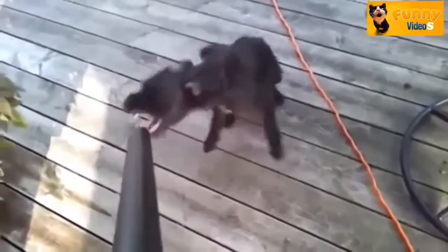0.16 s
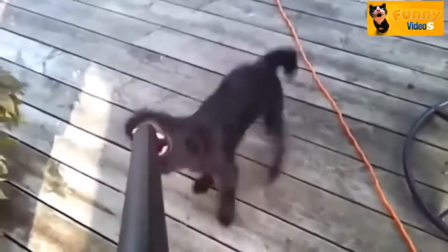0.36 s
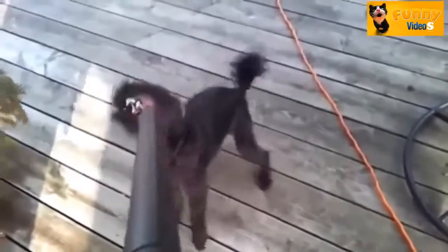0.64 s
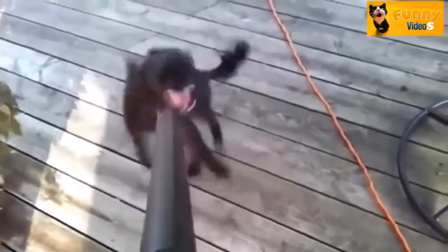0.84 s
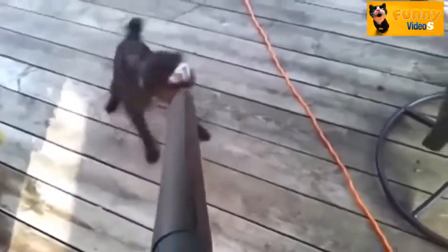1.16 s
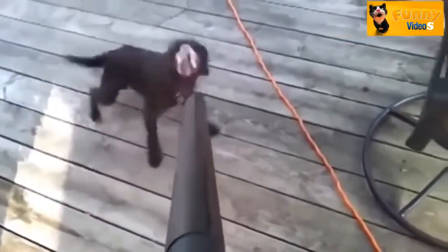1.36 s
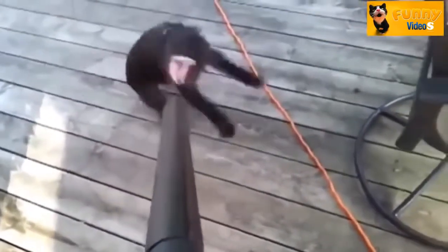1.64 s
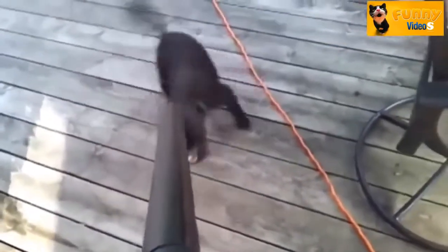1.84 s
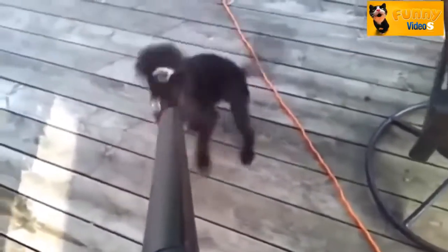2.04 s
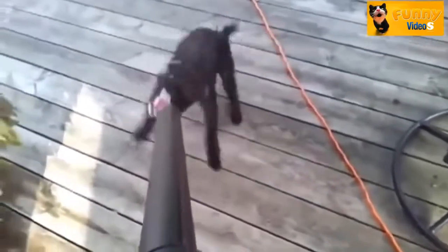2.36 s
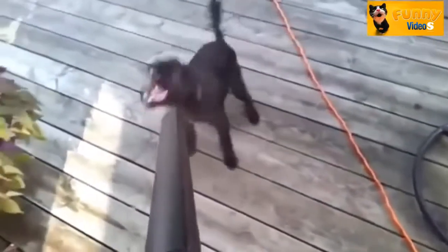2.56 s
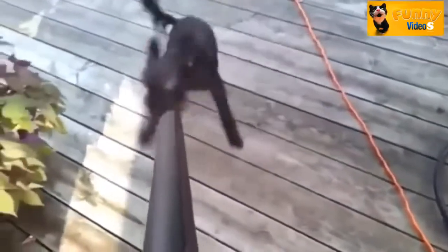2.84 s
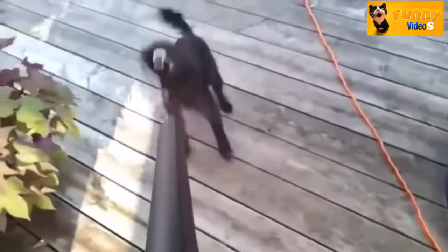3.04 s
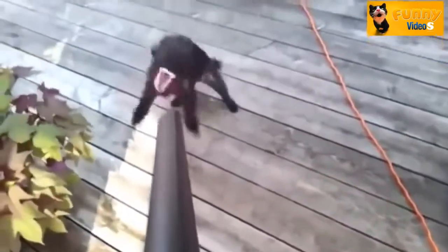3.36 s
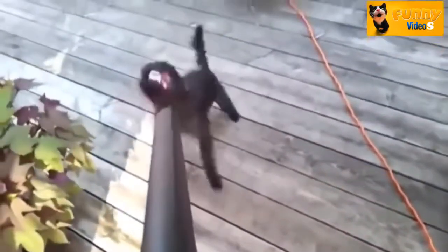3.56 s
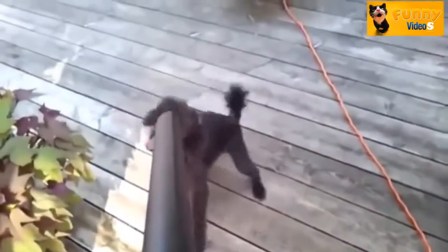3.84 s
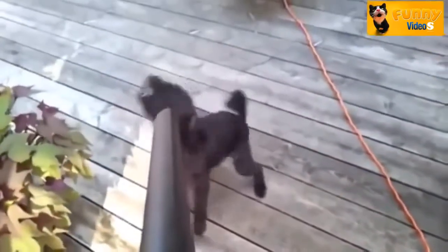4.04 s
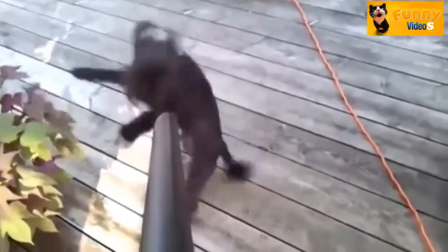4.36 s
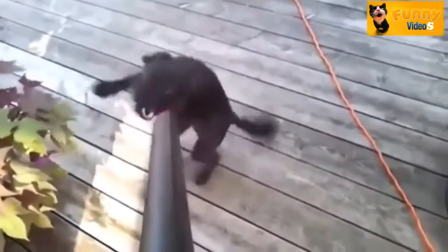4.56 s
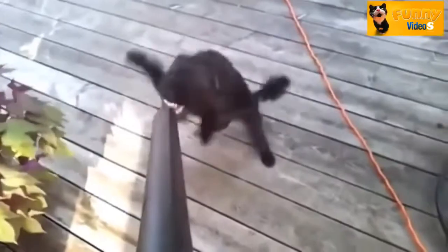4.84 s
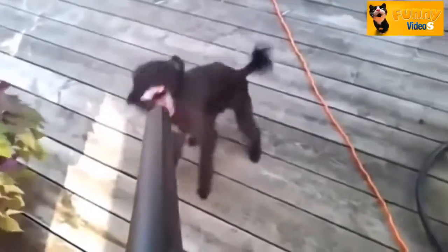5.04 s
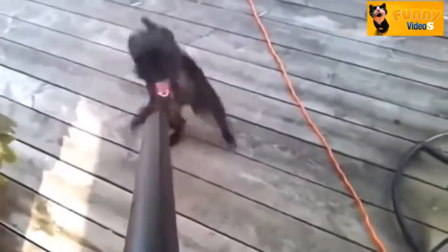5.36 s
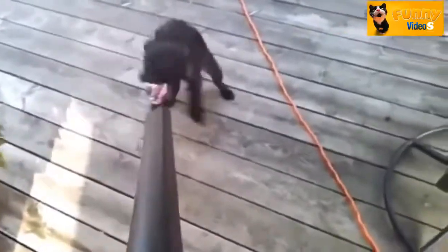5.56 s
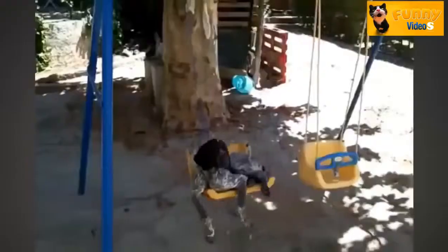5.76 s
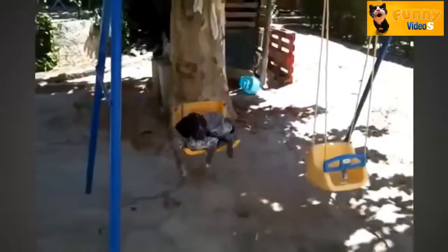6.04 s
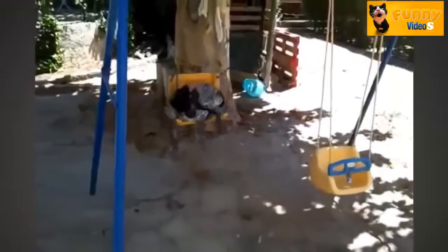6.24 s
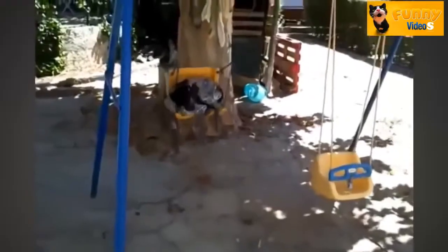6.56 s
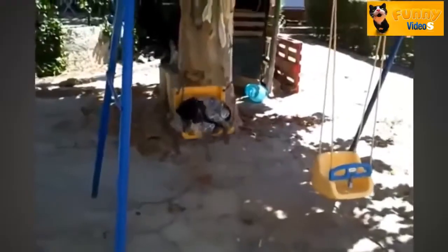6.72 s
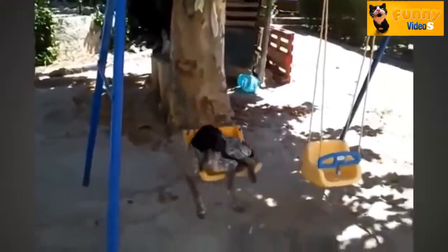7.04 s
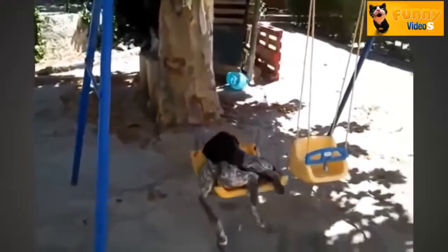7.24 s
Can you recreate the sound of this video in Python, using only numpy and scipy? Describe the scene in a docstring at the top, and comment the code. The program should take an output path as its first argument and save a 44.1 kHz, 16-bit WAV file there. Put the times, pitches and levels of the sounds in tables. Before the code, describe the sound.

Very close outdoors on a wooden deck, an electric leaf blower runs flat out, a harsh, overloaded rush of air with a steady electric whine. A dog biting at the jet causes irregular hissy, hollow-mouthed bursts. It stops abruptly. After a short silence, a much quieter yard fades in with low wind buffeting, faint leaf rustle and a swing that hums, creaks and finally squeals.

```python
"""An electric leaf blower at full power on a wooden deck, so close that it overloads the microphone: turbulent noise
coloured by the tube, and motor lines locked to the shaft; a dog bites at the jet, adding hiss and mouth rings.
The sound stops dead. After a silence a quiet yard fades in: filtered noise for wind buffeting the microphone,
a murk and rustling leaves, and a swing that hums, creaks and squeals by resonance and stick-slip."""
import sys
import numpy as np
from scipy import signal
from scipy.fft import rfft, irfft
from scipy.io import wavfile
from scipy.ndimage import uniform_filter1d

SR = 44100
rng = np.random.default_rng(int(sys.argv[2]) if len(sys.argv) > 2 else 0)


def to_wav(s):
    """Save 16-bit WAV."""
    ch = np.atleast_2d(s).T  # columns
    pcm = np.round(np.clip(ch, -1, 1) * 32767)  # PCM
    wavfile.write(sys.argv[1], SR, pcm.astype(np.int16))


N = 325888

# bites: the muzzle cuts the stream, which hisses, and the open mouth rings
# (middle t/s, half length/s, hiss level/dB, mouth f/Hz, ring level/dB)
MUZZLE_BITES = [(.06, 0.055, 2.5, 1987, 3.5), (.23, 0.05, 7, 3200, 3), (.42, 0.021, 4, 648, 2.5),
                (.52, 0.073, 4.5, 2250, 8), (.68, 0.082, 6, 3480, 3), (.85, 0.095, 5, 1800, 5),
                (1.06, 0.12, 5, 1955, 2), (1.5, 0.084, 0, 3500, 1.5), (1.81, 0.023, 5, 3480, 0.5),
                (1.91, 0.041, 1.5, 3500, 2.5), (2.3, .05, 2, 3000, 0.5), (2.42, 0.045, 5.5, 2005, 6.5),
                (2.68, .035, 4.5, 3500, -0.5), (2.86, 0.036, 1, 2100, 1), (3.0, 0.046, 2.5, 1855, 2.5),
                (3.62, 0.034, 1.5, 1990, 1), (3.83, 0.032, 1, 2014, 0.5), (4.5, 0.052, 2, 2000, 1),
                (4.75, 0.055, 5, 2206, 2), (4.89, 0.043, 5.5, 2000, 7), (5.1, 0.064, 2.5, 3000, -1),
                (5.21, .04, 5.5, 3530, -0.5), (5.34, 0.082, 4.5, 3010, 0), (5.5, .03, 3.5, 3000, -1),
                (5.63, 0.11, 3.5, 3520, -1), (5.83, 0.032, 3, 1994, 0)]
JET_FLICKER_DB = 0.75


def jet():
    """Edge noise of an obstructed jet: rise of its hiss in dB, bite by bite, with a random flicker."""
    t = np.arange(N) / SR
    hiss_db = sum(db * bump(t, s, half, order=3) for s, half, db, *_ in MUZZLE_BITES)
    return hiss_db + JET_FLICKER_DB * wander(15)


# relative spectrum of the fan's turbulence (f/Hz, level per Hz/dB)
TURBULENCE_SPECTRUM = [(8.8, -56), (15, -15.5), (123, -19), (307, -10), (468, -3.5), (592, -7), (855, -7.5),
                       (1080, -7.5), (1170, -10), (1450, -7), (1560, -8), (2090, -8), (6630, -15),
                       (7970, -24), (10400, -64), (17500, -120)]
# how the jet hiss tilts that spectrum (f/Hz, share of the jet hiss change/1)
HISS_SHARES = [(400, 0.14), (900, 0.028), (1500, 0.69), (3000, 0.36), (5000, 1.02), (8000, 1.45)]
# resonances of the blower tube (f/Hz, width/Hz, level/dB)
TUBE_RESONANCES = [(480, 120, 0), (700, 76, 8), (962, 110, 4.5), (1210, 46, 4.5), (1510, 200, -2),
                   (1810, 74, 3), (2215, 120, -1.5), (2500, 43, -3.5), (2770, 87, 2.5), (3010, 150, 2),
                   (3300, 150, 0), (3700, 98, 0.5), (4020, 140, 5)]
MOUTH_WIDTH_HZ = 260
ROAR_DB, ROAR_DROP = -17.5, 0.4  # level without jet hiss; dB lost per dB of jet hiss


def airflow(jet_db):
    """Turbulence noise filtered by resonators: fan air coloured by the tube, brightened by the jet and the mouth."""
    def field_db(hz, t):
        tube_db = sum(db / (1 + (2 * (hz - f) / w) ** 2) for f, w, db in TUBE_RESONANCES)
        mouth_db = sum(db * np.exp(-((hz - f) / MOUTH_WIDTH_HZ) ** 2) * bump(t, s, half)
                       for s, half, _, f, db in MUZZLE_BITES)
        hiss_db = read(HISS_SHARES, hz) * np.interp(t * SR, np.arange(N), jet_db)
        return read(TURBULENCE_SPECTRUM, hz) + tube_db + mouth_db + hiss_db
    return gain_of(ROAR_DB - ROAR_DROP * jet_db) * noise(field_db, patchy_db=1.28)


# brush rate, twice the shaft speed (t/s, f/Hz)
BRUSH_RATE = [(0, 361.3), (.4, 360.3), (.6, 360.5), (.8, 362.3), (1.0, 362.1), (1.2, 361.1), (1.5, 361.5),
              (2.0, 360.7), (2.4, 360.0), (3.2, 359.3), (3.5, 359.6), (4.0, 359.2), (4.3, 359.5),
              (4.75, 358.8), (5.2, 359.5), (5.4, 361.7), (5.6, 363.1), (5.85, 363.1)]
# the blower is swung about, so other faces of its housing point at the microphone
# (t/s, turn/1 about -1 to 1, tilt/1 about 0 to 1)
HOUSING_POSE = [(0, -0.97, 0), (.3, -0.89, .15), (.6, -0.12, 0.4), (.8, -0.58, 0.1), (1.05, -0.65, 0.24),
                (1.25, -1.2, 0), (1.8, -0.5, .1), (2.05, -0.81, 0), (2.4, -0.96, 0.06), (2.62, -1, 0.11),
                (3.0, .3, 0.4), (3.4, 0.06, 0.15), (3.7, 1, 0.22), (4.0, 0.8, -.1), (4.35, 1, 0),
                (4.7, 1, .7), (5.25, 0.24, 1), (5.5, -1.2, 0.25), (5.85, -0.69, 0.28)]
# strong partials: multiples of the brush rate (ratio/1)
STRONG_RATIOS = [1, 2, 3, 4, 5, 6, 9]
# strong partials (level/dB, change per unit of turn/dB, change per unit of tilt/dB, random sway/dB)
STRONG_LEVELS = [(-35.5, -0.5, -3.5, 1.7), (-31, -5.5, -7, 0.5), (-26.5, -1, 1.5, 0.4),
                 (-25.5, -1, -15.5, 1.4), (-39, 9.5, -5, 2), (-29, 0, -18.5, 1.5), (-35.5, 0.5, 2.5, 1.5)]
# weak partials: multiples of the brush rate (ratio/1)
WEAK_RATIOS = [.5, 1.5, 3.5, 4.5, 5.664, 7, 7.5, 8, 10, 10.5, 11, 12, 14, 16, 18, 20]
# weak partials (level before sway/dB)
WEAK_LEVELS = [-44.5, -37, -49.5, -54.5, -39, -40.5, -47, -43.5, -38, -42, -42, -41.5, -47, -44, -56, -49]
# overtones 2 to 5 of the bearing's lowest line (level before sway/dB)
BEARING_OVERTONES = [-45, -46, -46, -43]
BEARING_RATIO = 1.2922  # the bearing rolls at its own ratio to the brush rate
BEARING_DB, BEARING_SWAY_DB = -27, 1.5
LINE_DROP = 0.66  # dB lost by the strong lines and lowest bearing line per dB of jet hiss


def motor(jet_db):
    """Rotational harmonics: lines locked to a shaft that flutters under turbulent load; bites mask the strongest."""
    hz = play(BRUSH_RATE)[0] * (1 + 0.0004 * wander(10))
    turns = np.cumsum(hz) / SR
    turn, tilt = play(HOUSING_POSE)
    strong = 0
    for ratio, (db, turn_db, tilt_db, sway_db) in zip(STRONG_RATIOS, STRONG_LEVELS):
        level_db = db + turn_db * turn + tilt_db * tilt + sway_db * wander(4)
        strong = strong + tone(ratio * hz, level_db, shimmer_db=1.5, shimmer_hz=15)
    # weak lines come and go in four groups; the bearing overtones share these sways
    sway = [np.sqrt(2) * gain_of(2.4 * wander(3)) for _ in range(4)]
    weak = sum(gain_of(db) * sway[i % 4] * np.sin(2 * np.pi * (ratio * turns + rng.random()))
               for i, (ratio, db) in enumerate(zip(WEAK_RATIOS, WEAK_LEVELS)))
    bearing_db = BEARING_DB + BEARING_SWAY_DB * wander(3.7)
    bearing = tone(BEARING_RATIO * hz, bearing_db, shimmer_db=0.0, shimmer_hz=25)
    overtones = sum(gain_of(db) * sway[i] * np.sin(2 * np.pi * (i + 2) * BEARING_RATIO * turns)
                    for i, db in enumerate(BEARING_OVERTONES))
    return (strong + bearing) * gain_of(-LINE_DROP * jet_db) + weak + overtones


# lowest line of the stick-slip squeal (t/s, slip rate f/Hz, level/dB)
SLIP_LINE = [(7.145, 770, -62), (7.168, 785, -46), (7.2, 856, -52), (7.265, 871, -53), (7.285, 872, -44.5),
             (7.35, 868, -48), (7.375, 870, -43), (7.39, 858, -50)]
# multiples 2 to 6 join once the slips lock (full from t/s, full until t/s)
OVERTONE_SPANS = [(7.2, 7.4), (7.235, 7.4), (7.205, 7.4), (7.315, 7.37), (7.22, 7.355)]
# the same multiples (level on joining/dB, slope/(dB per s))
OVERTONE_LEVELS = [(-63, 15), (-53.5, 35), (-53.5, 40), (-59, 5), (-55, 5)]
ENTRY_S = 0.02  # ramp before and after each span
ROUGH_START_DB, ROUGH_END_DB, SWAP_DB = 3.5, 2.0, 1.0  # shimmer at start and end; trading of strength


def squeal(t):
    """Stick-slip oscillation: slips glide up and lock; roughness settles, overtones join and trade strength."""
    hz, lowest_db = play(SLIP_LINE)
    hz = hz * (1 + 0.0029 * wander(60))
    rough_db = np.interp(t, [SLIP_LINE[0][0], SLIP_LINE[-1][0]], [ROUGH_START_DB, ROUGH_END_DB])
    lines = tone(hz, lowest_db, rough_db, shimmer_hz=70)
    for multiple, ((s, end), (db, slope_db)) in enumerate(zip(OVERTONE_SPANS, OVERTONE_LEVELS), start=2):
        joined = np.clip(np.minimum(t - s, end - t) / ENTRY_S + 1, 0, 1)
        level_db = db + slope_db * np.maximum(t - s, 0) + SWAP_DB * wander(20)
        lines = lines + joined * tone(multiple * hz, level_db, rough_db, shimmer_hz=70)
    return lines * between(SLIP_LINE[0][0], N / SR + 1)


# span of the frame's hum (start t/s, end t/s)
HUM_SPAN = (6.67, 7.16)
# the hum's glide (first f/Hz, last f/Hz, top level/dB, change at the ends/dB)
HUM_GLIDE = (493.5, 486, -49.5, -12)
# resonances of a hanger (f/Hz, width/Hz, level/dB)
HANGER_RESONANCES = [(920, 35, 0), (755, 30, -2), (1118, 20, 0)]
# rough rubbing in a hanger (middle t/s, half length/s, level/dB, level of the first ring's neighbours/dB)
HANGER_CREAKS = [(6.62, 0.053, -56, -25), (6.76, .065, -52.5, -2), (6.95, .12, -62, -16)]
# broader rubbing in the links (middle t/s, half length/s, f/Hz, width/Hz, level/dB)
LINK_RUBS = [(7.0, 0.097, 1550, 220, -52), (7.175, .025, 2800, 200, -53), (7.2, .025, 2420, 150, -60),
             (7.24, .06, 3330, 160, -52)]
# tick of a link (t/s, f/Hz, envelope peak level/dB)
LINK_TICK = (7.134, 3900, -40)


def swing():
    """Friction-driven resonance: the frame hums, uneven slips ring the hanger, then lock to a squeal; a link ticks."""
    t = np.arange(N) / SR
    (start, end), (first_hz, last_hz, top_db, ends_db) = HUM_SPAN, HUM_GLIDE
    way = np.clip((t - start) / (end - start), 0, 1)
    hum_hz = first_hz + (last_hz - first_hz) * way
    hum_db = top_db + ends_db * (1 - np.sin(np.pi * way ** 1.4) ** 0.64)
    hum = tone(hum_hz, hum_db, shimmer_db=2.0, shimmer_hz=29.8) * between(start, end)
    slips = rng.standard_normal(N)
    first, *rest = [gain_of(db) * ring(slips, hz, w) for hz, w, db in HANGER_RESONANCES]
    creak = sum(gain_of(db) * bump(t, s, half, order=4) * (first + gain_of(rest_db) * sum(rest))
                for s, half, db, rest_db in HANGER_CREAKS)
    rubs = sum(gain_of(db) * bump(t, s, half) * ring(slips, hz, w) for s, half, hz, w, db in LINK_RUBS)
    s, tick_hz, tick_db = LINK_TICK
    tick = gain_of(tick_db) * np.exp(-((t - s) * 1200) ** 2) * np.sin(2 * np.pi * tick_hz * (t - s))
    return hum + rubs + creak + squeal(t) + tick


# relative spectrum of wind pressure on the microphone (f/Hz, level per Hz/dB)
WIND_SPECTRUM = [(5, -12), (14, 0), (30, -3), (65, -6), (90, -15), (130, -23), (250, -29), (400, -38),
                 (800, -90)]
CALM_DB = -38.5  # wind gain between gusts, before the lumps are evened and faded in
YARD_S = 6.563  # start of the yard


def buffet(gust_db):
    """Turbulent pressure fluctuation: deep lumps whose strength follows the gusts; strong gusts reach higher."""
    count = N - round(YARD_S * SR)
    hz = np.fft.rfftfreq(count, 1 / SR)
    z = rfft(rng.standard_normal(count)) * gain_of(read(WIND_SPECTRUM, hz))
    upper_share = 1 / (1 + (35 / (hz + 1)) ** 4)  # crossover near 35 Hz
    deep, upper = irfft(z * (1 - upper_share), count), irfft(z * upper_share, count)
    over_db = gust_db[-count:]
    lumps = evened(deep + upper * gain_of(0.31 * (over_db - over_db.mean())))
    # the largest lumps are held down by their own local power
    lumps = lumps / np.sqrt(abs(uniform_filter1d(lumps ** 2, size=3600)) + 0.33)
    return np.pad(gain_of(CALM_DB + over_db) * lumps, (N - count, 0))


# gusts (middle t/s, half length/s, level over the calm/dB)
WIND_GUSTS = [(6.87, 0.032, 7.5), (7.069, 0.07, 8), (7.3, .03, 3), (7.4, .03, 13)]
# relative spectrum of the distant murk (f/Hz, level per Hz/dB)
MURK_SPECTRUM = [(88, -33), (150, -6.5), (395, -13.5), (492, -12), (546, -10), (742, -13), (925, -13),
                 (1300, -16.5), (1550, -18.5), (3460, -21.5), (5000, -22), (6500, -49), (11000, -120)]
# relative spectrum of the rustling leaves (f/Hz, level per Hz/dB)
LEAF_SPECTRUM = [(1760, -38), (3000, -14), (3460, -19), (3740, -12), (5750, -6), (6500, -5), (7970, 2.5),
                 (10400, -26), (17500, -120)]
MURK_DB, LEAVES_DB = -49, -48  # once faded in; leaves without gusts
LEAVES_SHARE = 0.15  # dB of leaf hiss per dB of gust
FADE_S, FADE_FROM = 0.27, 0.17  # the yard air fades in from this share of its full gain


def yard_air():
    """Superposition of independent noises: wind, a distant murk and leaves, fading in together."""
    t = np.arange(N) / SR
    gust_db = sum(db * bump(t, s, half) for s, half, db in WIND_GUSTS)
    murk = noise(lambda hz, t: read(MURK_SPECTRUM, hz), patchy_db=1.5, start_s=YARD_S)
    leaves = noise(lambda hz, t: read(LEAF_SPECTRUM, hz), patchy_db=0.5, start_s=YARD_S)
    leaves_gain = gain_of(LEAVES_DB + LEAVES_SHARE * gust_db)
    fade = np.clip(FADE_FROM + (1 - FADE_FROM) * (t - YARD_S) / FADE_S, 0, 1)
    return (buffet(gust_db) + gain_of(MURK_DB) * murk + leaves_gain * leaves) * fade


def noise(field_db, patchy_db, start_s=0):
    """Short-time synthesis: random spectra under a dB field of Hz and s, with patches; rms 1, silent before start."""
    skip = round(start_s * SR)
    hz = np.fft.rfftfreq(1024, 1 / SR)
    t = start_s + np.arange((N - skip) // 256 + 5) * 256 / SR
    a, b, patches = rng.standard_normal((len(t), 513, 3)).T
    patches = evened(uniform_filter1d(uniform_filter1d(patches, size=10, axis=0), size=12, axis=1))
    z = (a + 1j * b) * gain_of(field_db(hz[:, None], t) + patchy_db * patches)
    x = signal.istft(z, nperseg=1024, noverlap=768)[1][:N - skip]
    return np.pad(evened(x), (skip, 0))


def tone(hz, db, shimmer_db, shimmer_hz):
    """Phase is the integral of frequency: a sine on a pitch curve, at rms level db before its strength wavers."""
    turns = np.cumsum(hz) / SR + rng.random()
    return np.sqrt(2) * gain_of(db + shimmer_db * wander(shimmer_hz)) * np.sin(2 * np.pi * turns)


def ring(x, hz, width):
    """Second-order resonance: Q is centre frequency over width; output at rms 1."""
    return evened(signal.lfilter(*signal.iirpeak(hz, hz / width, SR), x))


def wander(hz):
    """Low-passed random process: slow chance of about rms 1 with changes up to hz, drawn every 64 samples."""
    z = rfft(rng.standard_normal(8192))
    slow = evened(irfft(z / (1 + (np.fft.rfftfreq(8192, 64 / SR) / hz) ** 4)))
    return np.interp(np.arange(N) / 64, np.arange(8192), slow)


def bump(t, middle_s, half_s, order=2):
    """Generalised Gaussian envelope: a bell of height 1; a higher order has a flatter top."""
    return np.exp(-abs((t - middle_s) / half_s) ** order)


def between(start_s, end_s):
    """Gated envelope: on from start to end, with 1 ms edges."""
    t = np.arange(N) / SR
    return np.clip(np.minimum(t - start_s, end_s - t) * 1000, 0, 1)


def play(rows, t=None):
    """Linear interpolation: columns of a curve table at times t (every sample by default)."""
    s, *columns = np.transpose(rows)
    return [np.interp(np.arange(N) / SR if t is None else t, s, c) for c in columns]


def read(points, hz):
    """Logarithmic frequency scale: a spectrum table interpolated along it."""
    f, value = np.transpose(points)
    return np.interp(np.log(hz + 1), np.log(f + 1), value)


def gain_of(db):
    """Level to amplitude ratio: 20 dB per factor of ten."""
    return 10 ** (np.asarray(db) / 20)


def evened(x):
    """Mean-square normalisation: scales to rms 1."""
    return x / np.sqrt(np.mean(x ** 2) + 1e-20)


STOP_S = 5.847  # the blower stops dead


def scene():
    """Linear superposition: the blower until it stops, silence, then the yard."""
    jet_db = jet()
    blower = (airflow(jet_db) + motor(jet_db)) * between(-1, STOP_S)
    yard = (yard_air() + swing()) * between(YARD_S, N / SR + 1)
    return (blower + yard)[None]


def squash(x, ceiling, knee):
    """Saturation: straight for small signals, bending to the ceiling; a larger knee is harder."""
    return x / (1 + abs(x / ceiling) ** knee) ** (1 / knee)


# playback colour (f/Hz, level/dB)
PLAYBACK_COLOUR = [(100, -0.5), (8000, 0), (9000, -1), (11000, 3), (14800, 5.5), (15200, 0.5),
                   (20000, -1.5)]
MIC_HZ, EDGE_HZ = 7850, 15600  # low-pass edges of the microphone stage and of the output


def record(dry):
    """Nonlinear distortion: the band-limited microphone saturates; a later stage shaves peaks, which spits treble."""
    mic_filter = signal.firwin(141, MIC_HZ, window=("kaiser", 8), fs=SR)[None]
    narrow = signal.oaconvolve(squash(dry, ceiling=0.25, knee=3.5), mic_filter, "same")
    shaved = squash(narrow, ceiling=0.25, knee=7.3)
    hz = np.linspace(0, SR / 2, num=257)
    colour_filter = signal.firwin2(255, hz, gain_of(read(PLAYBACK_COLOUR, hz)), fs=SR)[None]
    coloured = signal.oaconvolve(shaved, colour_filter, "same")
    edge_filter = signal.firwin(511, EDGE_HZ, window=("kaiser", 9), fs=SR)[None]
    return signal.oaconvolve(coloured, edge_filter, "same")


dry = scene()
out = record(dry)
to_wav(out)
```